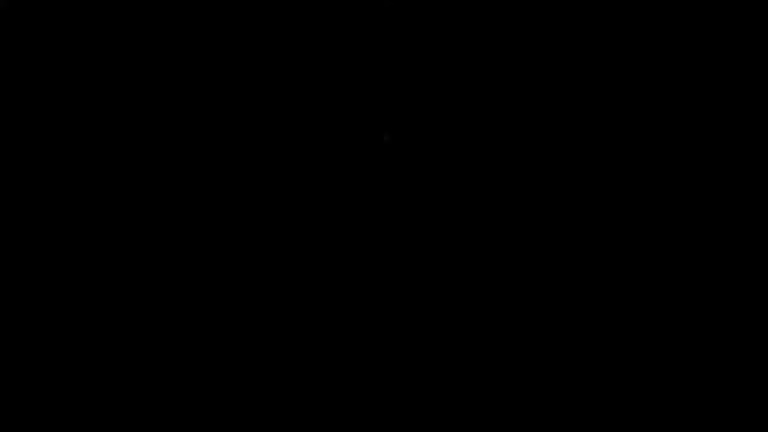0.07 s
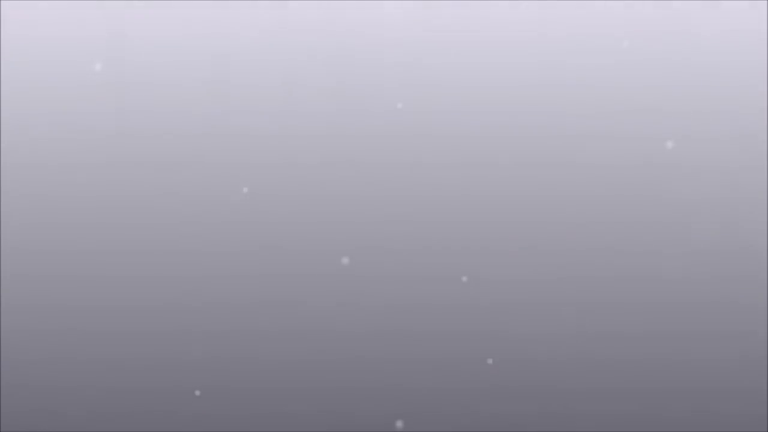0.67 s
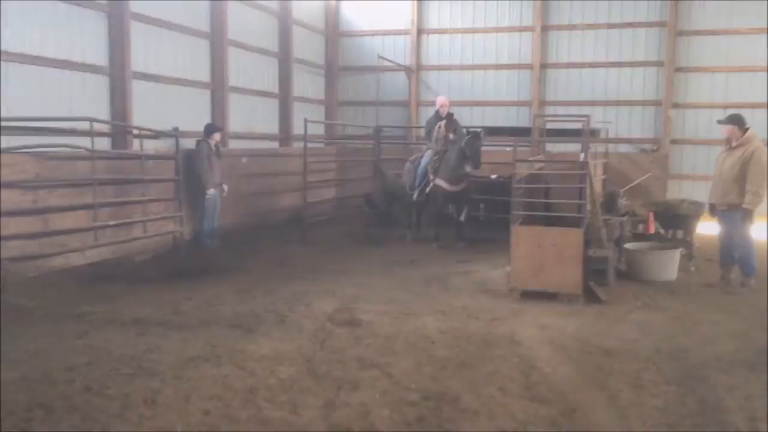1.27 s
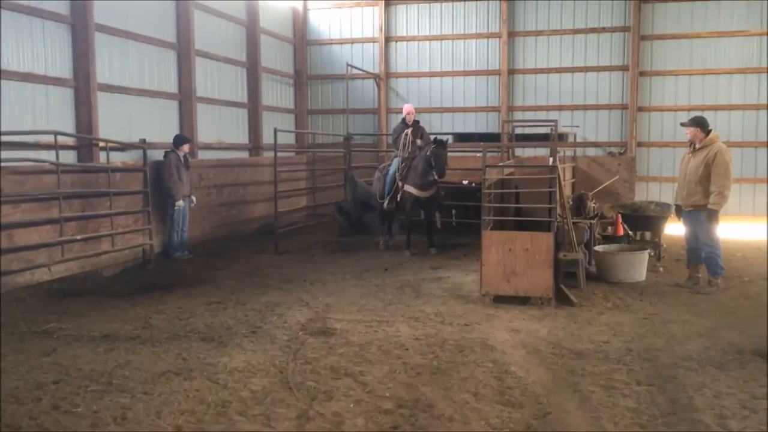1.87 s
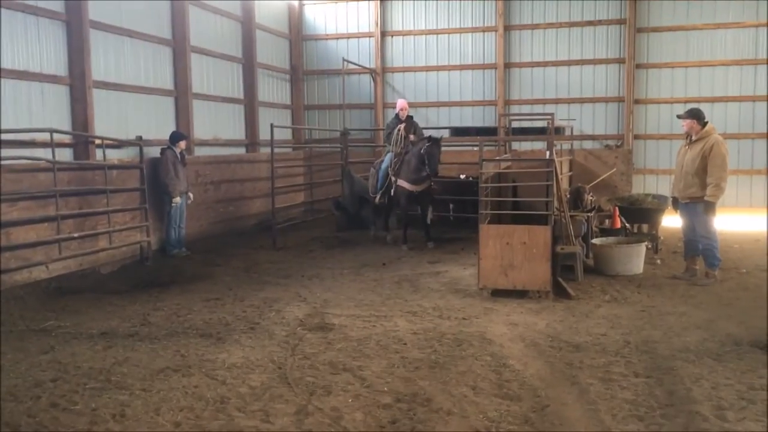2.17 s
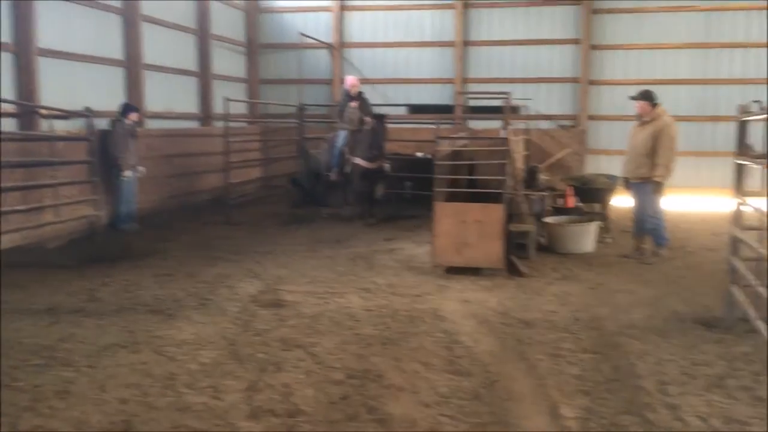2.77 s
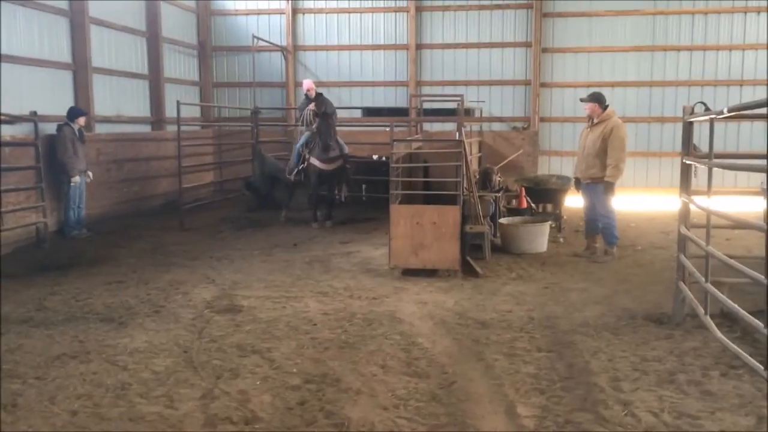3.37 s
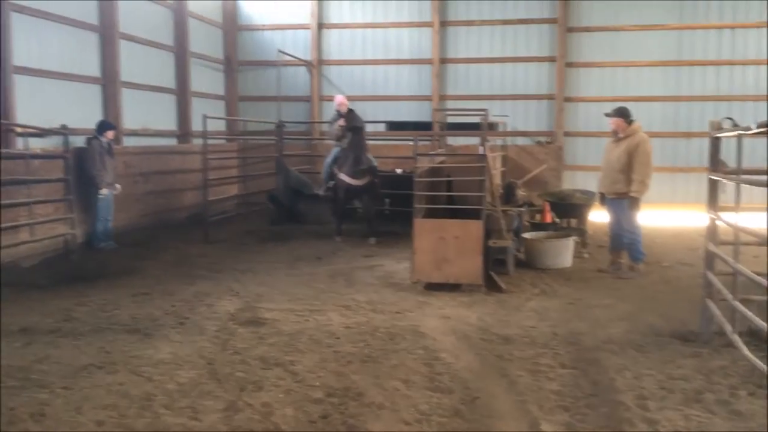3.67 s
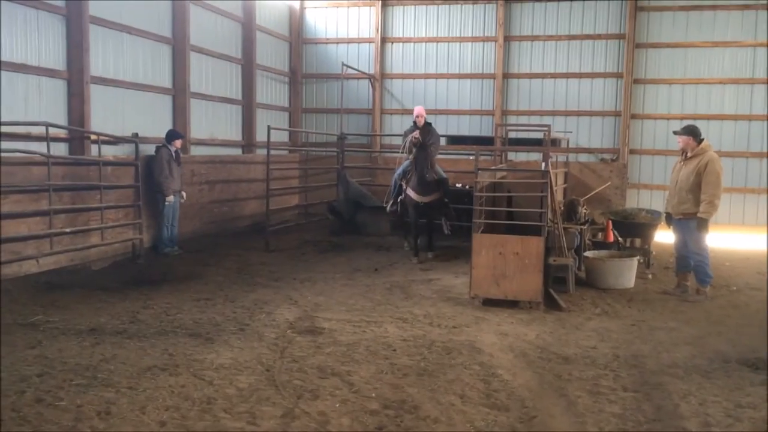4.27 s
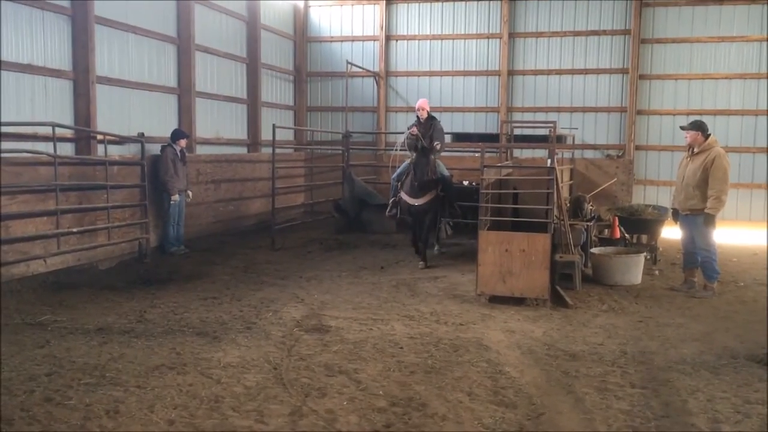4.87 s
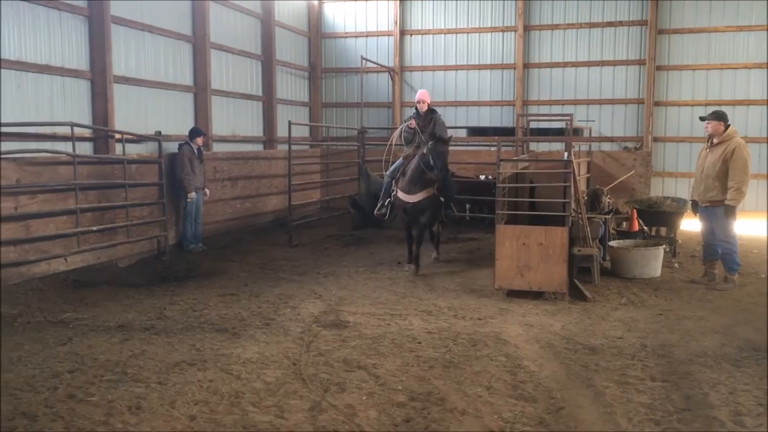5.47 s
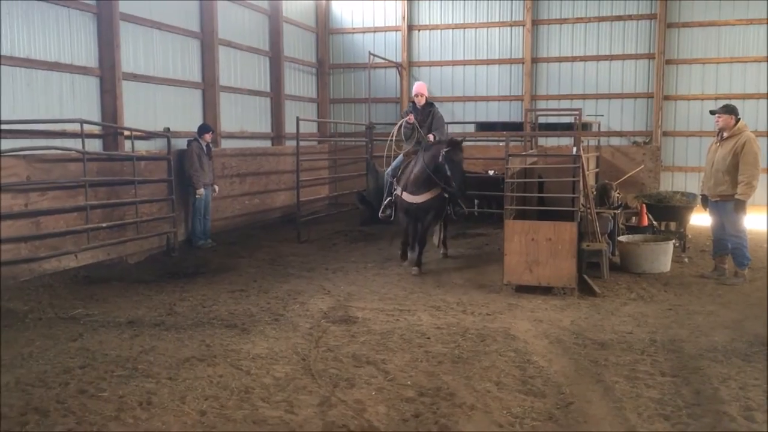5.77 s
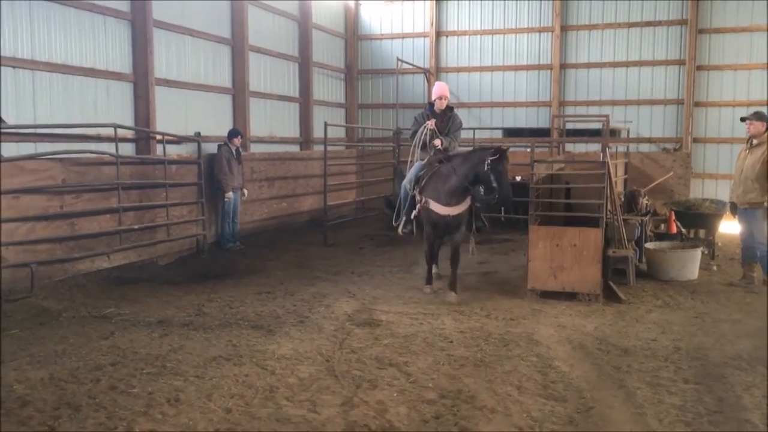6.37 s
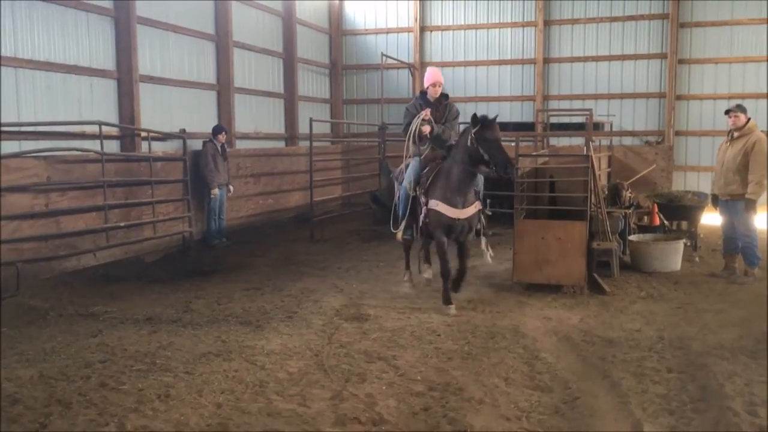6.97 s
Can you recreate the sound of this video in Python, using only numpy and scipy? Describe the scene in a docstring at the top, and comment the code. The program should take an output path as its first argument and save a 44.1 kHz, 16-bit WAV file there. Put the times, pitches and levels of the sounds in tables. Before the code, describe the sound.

Out of silence, a steady hiss of rain on a metal roof slowly rises inside a big, rumbling indoor arena. Nearby drips tick and splash while a horse's hooves crunch through soft dirt in front of the microphone, busier toward the end, where two soft low thuds sound. A faint, thin ringing pulses evenly behind them, and the close sounds trail off in the hall's echo.

```python
"""Rain on a riding hall roof.

Inside a large riding hall, rain patters steadily on the sheet metal above a stereo microphone.
Close by, heavy drops splash, a horse scuffs through soft dirt and two dull thuds sound; the far walls
answer. A thin ring near 2 kHz swells at an even pace. Underneath, the hall rumbles, with a soft, rising
hum and a deep drone that wavers in pitch. The fader comes up slowly from silence."""
import sys
import numpy as np
from scipy import signal
from scipy.fft import rfft, irfft
from scipy.io import wavfile
from scipy.ndimage import uniform_filter1d

SR = 44100
rng = np.random.default_rng(int(sys.argv[2]) if len(sys.argv) > 2 else 0)


def generate_wav(sig):
    """Save sig (samples, or channels by samples) to the path in sys.argv[1] as 16-bit PCM at SR."""
    pcm = np.round(np.clip(np.atleast_2d(sig).T, -1, 1) * 32767).astype(np.int16)
    wavfile.write(sys.argv[1], SR, pcm)


N = 314874
TIME = np.arange(N) / SR
FREQS = np.maximum(np.arange(N // 2 + 1) * SR / N, 1)


def from_db(db):
    """Decibels to gain."""
    return 10 ** (np.asarray(db) / 20)


def unit_rms(x):
    """Scale to rms 1."""
    return x / np.sqrt(np.mean(x ** 2) + 1e-20)


def over_time(rows):
    """One curve per value column of a (time [s], values...) table, sample by sample."""
    times, *columns = np.transpose(rows)
    return [np.interp(TIME, times, column) for column in columns]


def over_hz(points):
    """A (frequency [Hz], value) table joined on a log-frequency axis."""
    hz, value = np.transpose(points)
    return np.interp(np.log(FREQS), np.log(hz), value)


def drift(rate_hz):
    """A random wander, mostly slower than rate_hz; rms 1."""
    return unit_rms(irfft(rfft(rng.standard_normal(N)) / (1 + (FREQS / rate_hz) ** 2), N))


def left_right(mid, side, side_share):
    """Decode mid and side; a small side share keeps the sound straight ahead."""
    return np.array([mid + side_share * side, mid - side_share * side])


def at_microphone(pair, colour):
    """Colour two unrelated signals and spread them as the hall's sound reaches the microphone; rms 1."""
    # how alike the two channels are: (frequency [Hz], correlation [-1..1])
    likeness = [(45, 0.5), (160, 0.7), (300, 0.19), (580, -0.47), (1100, 0.12), (1600, -0.14), (2200, 0.11),
                (4200, -0.06), (5000, 0)]
    # the lean to the left: (frequency [Hz], left minus right [dB])
    balance = [(100, 1.8), (800, 0.34), (3000, 1.7), (4600, 0.55), (6000, 3.5), (8500, 0.37), (12000, 1.5),
               (14000, 7.1), (16000, 1.7)]
    alike = over_hz(likeness)
    mid, side = rfft(pair) * colour * np.sqrt([1 + alike, 1 - alike])
    lean = from_db(over_hz(balance) * np.array([[.5], [-.5]]))
    return unit_rms(irfft(left_right(mid, side, 1) * lean, N))


def impacts(per_s, size_db, samples):
    """Two trains of random clicks of uneven size; rms 1."""
    hits = rng.random((2, samples)) < per_s / SR
    heights = from_db(size_db * np.minimum(rng.exponential(1, (2, samples)), 3.6))
    return unit_rms(hits * heights * rng.choice([-1, 1], (2, samples)))


def roof_drops(per_s, size_db, tick_db, spray_db, spray_s, far_db, flurry_db):
    """Near drops tick and throw a short spray; the countless far ones merge to a smooth hiss."""
    ticks = impacts(per_s, size_db, N)
    spray_power = signal.lfilter([1], [1, -np.exp(-1 / (spray_s * SR))], (ticks ** 2).sum(axis=0))
    spray = unit_rms(np.sqrt(spray_power) * rng.standard_normal((2, N)))
    far = rng.standard_normal((2, N))
    flurries = from_db(flurry_db * drift(12.7))
    return (from_db(tick_db) * ticks + from_db(spray_db) * spray + from_db(far_db) * far) * flurries


def panel_modes(depth_db, spacing_hz):
    """The roof sheets' countless modes ripple the spectrum."""
    ripple = np.interp(FREQS / spacing_hz, np.arange(SR // 10), rng.standard_normal(SR // 10))
    return from_db(depth_db * ripple)


def rain():
    """Rain on the metal overhead: a bright patter over a duller wash that the hall has smeared."""
    # the shower's nearly steady strength: (time [s], patter level [dB], wash level [dB])
    shower = [(0.4, -47.5, -53), (0.55, -48.5, -50), (0.74, -44, -48.5), (0.95, -45.5, -50),
              (1.3, -44.5, -49.5), (1.52, -49, -50.5), (1.68, -46, -49.5), (1.92, -48, -52),
              (2.0, -44.5, -49.5), (2.33, -45.5, -49), (2.53, -46.5, -51), (2.7, -45.5, -49),
              (2.88, -48.5, -48.5), (3.3, -46, -49.5), (3.6, -46.5, -50), (4.3, -47, -50.5),
              (4.5, -47, -50), (4.9, -47, -48.5), (5.1, -47.5, -50), (5.3, -47.5, -49), (5.5, -48, -49.5),
              (5.7, -46.5, -49), (6.2, -46.5, -49), (6.45, -47, -49.5), (6.57, -46.5, -50),
              (6.85, -47, -49), (7.1, -45.5, -49.5)]
    # spectrum of the patter: (frequency [Hz], relative level [dB])
    patter_colour = [(3500, -21.5), (4250, -4), (4900, 0), (5600, 0.5), (7000, -3), (8000, -4), (9000, -4),
                     (10800, -9.5), (12500, -9.5), (14000, -11), (15800, -10), (17000, -35)]
    # spectrum of the wash: (frequency [Hz], relative level [dB])
    wash_colour = [(200, -11), (380, 0.5), (500, 2), (780, -2.5), (1100, -0.2), (1550, -1.5), (2300, -0.5),
                   (2900, -1.5), (3700, 0.8), (4300, -4), (5200, -15.5), (8000, -50)]
    patter_db, wash_db = over_time(shower)
    patter = roof_drops(per_s=700, size_db=5.5, tick_db=-2, spray_db=5.5, spray_s=0.017,
                        far_db=2.5, flurry_db=0.67)
    wash = roof_drops(per_s=1100, size_db=4.0, tick_db=0, spray_db=2.5, spray_s=0.0041,
                      far_db=6.0, flurry_db=1.0)
    sheets = panel_modes(depth_db=1.26, spacing_hz=23.86)
    return (from_db(patter_db) * at_microphone(patter, from_db(over_hz(patter_colour)))
            + from_db(wash_db) * at_microphone(wash, sheets * from_db(over_hz(wash_colour))))


def resonance(hz, width_hz):
    """Stereo noise ringing in one narrow band; rms 1."""
    return at_microphone(rng.standard_normal((2, N)), 1 / (1 + ((FREQS - hz) / width_hz) ** 2))


def hall_rumble(level_db):
    """Broad low noise all around, with a few of the hall's resonances standing out."""
    # spectrum of the rumble: (frequency [Hz], relative level [dB])
    colour = [(15, -23), (30, -5), (65, 2.5), (85, -5.5), (110, 0.5), (135, -1), (170, -1.5), (210, -4),
              (270, -7.5), (350, -10), (450, -40), (900, -57)]
    # the hall's low resonances: (frequency [Hz], width [Hz], level against the rumble [dB])
    room_modes = [(120.6, 5.3, -12.5), (149.5, 26, -7.5), (235, 9.6, -13.5), (361, 22, -15.5)]
    broad = at_microphone(rng.standard_normal((2, N)), from_db(over_hz(colour)))
    booms = sum(from_db(mode_db) * resonance(hz, width_hz) for hz, width_hz, mode_db in room_modes)
    return from_db(level_db) * (broad + booms)


def wavering_tone(course, waver, waver_hz):
    """A tone that follows a (time [s], level [dB], pitch [Hz]) table, unsteady in level and phase."""
    level_db, hz = over_time(course)
    unsteady = 1 + waver * (drift(waver_hz) + 1j * drift(waver_hz))
    phase = 2 * np.pi * np.cumsum(hz) / SR
    return from_db(level_db) * unit_rms(np.real(unsteady * np.exp(1j * phase)))


def drone_and_hum():
    """Two unsteady low tones, a touch louder on the left."""
    # the deep drone: (time [s], level [dB], pitch [Hz])
    drone_course = [(1.3, -65, 45), (1.9, -59, 47.1), (2.08, -52, 46.8), (2.4, -67, 47.4),
                    (3.15, -55.5, 49.6), (3.5, -62.5, 48.37), (4.9, -63, 54.2), (5.55, -60, 54.3),
                    (5.9, -53, 53.04), (6.35, -52, 52.17), (6.55, -59, 50.4), (6.72, -49.5, 46.1),
                    (7.1, -67, 46.2)]
    # a soft hum that comes up early, climbs and sinks into the rumble: (time [s], level [dB], pitch [Hz])
    hum_course = [(0.62, -68, 123.8), (0.73, -56, 126), (0.85, -48.5, 131.3), (0.95, -65, 130.7),
                  (1.1, -48.5, 132.2), (1.28, -63, 138.8), (1.42, -53, 152), (1.55, -63, 147.1),
                  (1.8, -52, 158.2), (2.0, -65, 158), (2.2, -60, 151.1), (2.4, -64, 158),
                  (2.6, -51.5, 159.7), (2.85, -78, 160)]
    drone = wavering_tone(drone_course, waver=0.66, waver_hz=7.0)
    hum = wavering_tone(hum_course, waver=0.64, waver_hz=16)
    return (drone + hum) * from_db([[.6], [-.6]])


def late_on_left(x, lag_s):
    """The sound reaches the left side of the microphone a little later."""
    return np.array([np.interp(TIME - lag_s, TIME, x[0]), x[1]])


def thin_ring(hz, width_hz, rest_db, rough_db, rough_hz):
    """One narrow resonance, rough as a scrape, that swells about twice a second and lingers between."""
    # swells of the ring: (time [s], level [dB], time to sink to about a third [s])
    swells = [(0.45, -61.5, .1), (0.93, -60, 0.18), (1.48, -57.5, 0.19), (2.06, -54.5, .08),
              (2.7, -63, 0.18), (3.26, -59, 0.14), (3.73, -55, 0.055), (4.28, -56.5, 0.098),
              (4.83, -60.5, .12), (5.28, -54.5, .08), (5.95, -58, 0.08), (6.52, -59, .14),
              (6.95, -55.5, 0.088)]
    swell = sum(from_db(level_db) * np.exp(-((TIME - s) / sink_s) ** 2) for s, level_db, sink_s in swells)
    scrape = unit_rms(from_db(rough_db * drift(rough_hz)))
    return np.hypot(swell, from_db(rest_db)) * scrape * resonance(hz, width_hz)


def band(x, hz, ratio):
    """Two passes of a gentle band-pass from hz / ratio to hz * ratio."""
    sos = signal.butter(1, [hz / ratio, min(hz * ratio, .45 * SR)], "band", fs=SR, output="sos")
    return signal.sosfilt(sos, signal.sosfilt(sos, x))


def heavy_drops(rebound, rebound_s, scatter_s, scatter_db, side_share):
    """Each near drop lands with a double tick; its droplets fall back in gritty clusters and die away."""
    # single drops: (time [s], relative tick level [dB], relative splash level [dB], centre [Hz], decay [s])
    drops = [(0.639, -45, -54, 5000, .012), (0.877, -41, -41, 5200, 0.014), (1.048, -47, -46, 5300, 0.016),
             (1.627, -48, -52, 5770, .025), (1.856, -42, -46.5, 5030, 0.016),
             (2.169, -56, -50, 5440, 0.032), (2.605, -41, -53.5, 7980, .023), (2.767, -40, -42, 5200, 0.01),
             (2.826, -49, -62, 5800, 0.0096), (2.913, -45, -48, 6070, 0.0097),
             (3.106, -38, -46, 4870, 0.013), (3.199, -43, -43.5, 6100, .015),
             (3.437, -41, -45.5, 5920, 0.012), (3.566, -44, -51, 7700, 0.011), (3.678, -44, -51, 5720, .01),
             (3.893, -44, -54, 10500, 0.015), (4.067, -38, -45, 5850, 0.011),
             (4.221, -35, -40.5, 5770, 0.012), (4.263, -44, -50, 6100, .006), (4.288, -47, -53, 5770, .006),
             (4.316, -47, -52, 5800, .008), (4.402, -45, -48, 5960, 0.013), (4.504, -46, -50, 7380, 0.0094),
             (4.63, -44, -51, 5800, 0.01), (4.756, -43, -47, 5840, .015), (4.813, -40, -49, 6800, 0.015),
             (4.86, -45, -45, 3310, 0.0097), (5.027, -48, -55, 7000, .012), (5.18, -46, -43, 5420, 0.0089),
             (5.354, -45, -51, 5490, .008), (5.55, -47, -50, 5700, 0.025), (5.677, -46, -47, 5400, .01),
             (5.786, -43, -49, 5300, 0.018), (5.835, -39, -51, 5100, .008), (5.913, -49, -51, 5700, .01),
             (5.943, -43, -48, 6400, 0.013), (6.002, -43, -47, 6000, .008), (6.042, -43, -52, 6000, .008),
             (6.112, -34.5, -42.5, 5500, 0.018), (6.278, -49, -54, 6200, .008),
             (6.371, -46, -51, 5100, 0.0074), (6.395, -45, -51, 5900, 0.0089),
             (6.657, -40, -48, 5740, 0.014), (6.723, -44, -52, 6200, 0.013), (6.869, -46, -52, 6500, .008),
             (6.955, -43.5, -49, 6430, 0.011), (7.005, -44, -46, 6200, .012), (7.105, -47, -54, 5820, .01)]
    out, t = np.zeros((2, N + SR)), TIME[:SR // 5]
    for s, tick_db, splash_db, hz, decay_s in drops:
        knocks = np.exp(-(t / 0.00029) ** 2) + rebound * np.exp(-((t - rebound_s) / 0.00043) ** 2)
        flutter = unit_rms(uniform_filter1d(rng.standard_normal(len(t)), size=50))
        clusters = unit_rms(from_db(scatter_db * flutter))
        scatter = (1 - np.exp(-(t / scatter_s) ** 2)) * np.exp(-t / decay_s) * clusters
        ticks = from_db(tick_db) * knocks * rng.choice([-1, 1], (2, len(t)))
        droplets = from_db(splash_db) * scatter * impacts(per_s=8900, size_db=-5.0, samples=len(t))
        mid, side = band(ticks + droplets, hz, ratio=1.28) * from_db(15.5)
        at = round(s * SR)
        out[:, at:at + len(t)] += left_right(mid, side, side_share)
    return out[:, :N] * from_db([[.8], [-.8]])


def grit(s, level_db, hz, length_s):
    """A brief swell of dense grains in one band, centred on time s."""
    out, t = np.zeros((2, N + SR)), TIME[:SR // 2] - 1 / 4
    grains = unit_rms(band(impacts(per_s=2300, size_db=3.0, samples=len(t)), hz, ratio=1.5))
    at = round(s * SR) - len(t) // 2
    out[:, at:at + len(t)] = from_db(level_db) * grains * np.exp(-2 * (t / length_s) ** 2)
    return out[:, :N]


def hooves(sand_side_share):
    """Hooves crunch through the dirt, spread wide across both sides, and throw up a hiss of sand that sits
    nearly straight ahead of the microphone."""
    # hoof scuffs: (time [s], crunch level [dB], crunch centre [Hz],
    #               sand level [dB], sand centre [Hz], length [s])
    scuffs = [(1.055, -48, 2400, -62, 6700, .015), (1.226, -47.5, 2520, -57, 6650, .04),
              (2.031, -51, 2598, -53, 6220, 0.045), (2.22, -52, 2200, -61, 6700, 0.061),
              (2.318, -50, 2200, -52, 7000, .03), (2.428, -62, 2400, -51, 6000, .03),
              (2.619, -48.5, 2825, -58, 10000, .03), (2.803, -50, 2300, -60, 6700, 0.031),
              (3.119, -47, 3400, -62, 6700, .014), (3.245, -62, 2500, -59, 9500, 0.018),
              (3.717, -55, 1970, -51.5, 9940, .04), (3.911, -52, 1800, -58, 10040, .025),
              (4.667, -73, 2500, -55, 10500, 0.066), (4.759, -49.5, 2490, -62, 6700, 0.033),
              (4.866, -48.5, 2880, -69, 6700, 0.033), (5.043, -62, 2500, -49.5, 6560, 0.038),
              (5.362, -50.5, 2200, -49.5, 6900, 0.043), (5.404, -54, 2430, -52, 12100, 0.034),
              (5.639, -48.5, 3800, -51, 6160, 0.026), (5.695, -46, 1570, -49.5, 5600, 0.034),
              (5.757, -52.5, 1600, -67, 6670, 0.054), (5.918, -50, 2400, -51, 6740, 0.021),
              (6.026, -44, 2720, -52, 6710, 0.027), (6.067, -51, 1730, -50.5, 7000, 0.037),
              (6.121, -46, 3000, -57, 6700, 0.017), (6.307, -54, 1510, -46.5, 6900, 0.029),
              (6.395, -58, 2490, -49, 6200, 0.033), (6.655, -50, 1905, -56, 6700, 0.052),
              (6.732, -50, 2400, -51, 7500, .014), (6.796, -53, 2600, -53, 6200, 0.029),
              (7.009, -56, 2000, -53, 7960, 0.057)]
    crunch = sum(grit(s, level_db, hz, length_s) for s, level_db, hz, _, _, length_s in scuffs)
    mid, side = sum(grit(s, level_db, hz, length_s) for s, _, _, level_db, hz, length_s in scuffs)
    return crunch + left_right(mid, side, sand_side_share)


def thuds(side_share):
    """Dull low bumps nearby, almost the same in both channels."""
    # soft thuds: (time [s], level [dB], centre [Hz], length [s])
    bumps = [(5.569, -50.5, 127, 0.047), (7.001, -50.5, 109, 0.24)]
    mid, side = sum(grit(*bump) for bump in bumps)
    return left_right(mid, side, side_share)


def far_walls(x, t60_s):
    """The far walls return a diffuse tail after 15 ms, different at each side."""
    t = TIME[:SR]
    tail = rng.standard_normal((2, SR)) * from_db(-60 * t / t60_s) * (t > .015)
    return signal.fftconvolve(x, tail / np.sqrt(np.sum(tail[0] ** 2)), axes=1)[:, :N]


def wavering_width(x, waver_db, waver_hz):
    """The treble's image narrows at constant power; the narrower it is, the more its width wavers."""
    # the treble starts wide, draws in and opens again unevenly: (time [s], side against mid [dB])
    treble_width = [(2.6, 1), (2.7, -27), (3.0, -19), (3.35, -5.5), (3.75, -3), (3.9, -13.5), (4.35, -6.5),
                    (5.1, -7), (5.5, -2.5), (6.0, -1), (6.68, -3), (6.84, -20), (7.0, -5)]
    side_db, = over_time(treble_width)
    width = from_db(np.minimum(side_db, 0) * from_db(waver_db * drift(waver_hz)))
    treble = irfft(rfft(x) * over_hz([(4450, 0), (4650, 1), (12200, 1), (13200, 0)]), N)
    mid, side = (treble[0] + treble[1]) / 2, (treble[0] - treble[1]) / 2
    return x - treble + left_right(mid, side, width) * np.sqrt(2 / (1 + width ** 2))


def scene():
    """Drops, hooves and thuds close to the microphone, echoing in the hall; rain, ring and rumble behind."""
    near = heavy_drops(rebound=0.59, rebound_s=0.0021, scatter_s=0.0073, scatter_db=4, side_share=0.67)
    near += hooves(sand_side_share=0.26) + thuds(side_share=0.22)
    ambience = rain() + thin_ring(hz=2040, width_hz=85, rest_db=-64.5, rough_db=1.7, rough_hz=70)
    ambience += late_on_left(hall_rumble(level_db=-53.5) + drone_and_hum(), lag_s=0.00031)
    reverb = from_db(-9.0) * far_walls(near, t60_s=3)
    return wavering_width(ambience + near + reverb, waver_db=1.5, waver_hz=7)


def record(dry):
    """Silence, then the fader eases in and rises in a straight line of gain; the top is cut steeply."""
    start_s, end_s, ease_s, cutoff_hz = 0.305, 7.14, 0.17, 15800
    since = np.maximum(TIME - start_s, 0)
    soft_start = 1 - from_db(-7) * np.exp(-since / ease_s)
    fader = since / (end_s - start_s) * soft_start
    low_pass = signal.ellip(12, .1, 70, cutoff_hz, fs=SR, output="sos")
    return signal.sosfilt(low_pass, dry * fader)


dry = scene()
out = record(dry)
generate_wav(out)
```